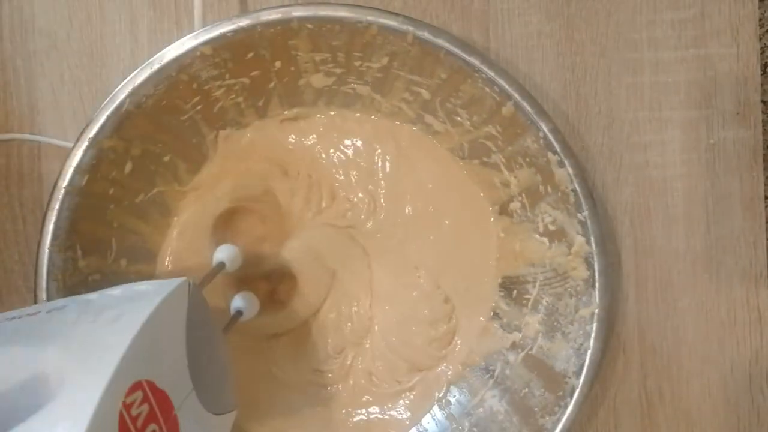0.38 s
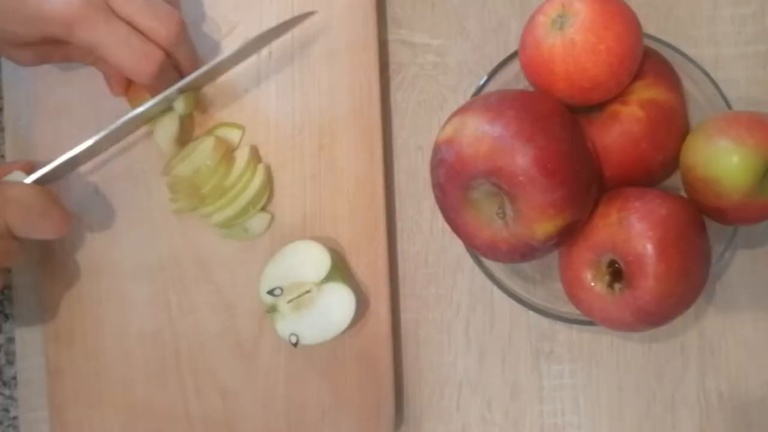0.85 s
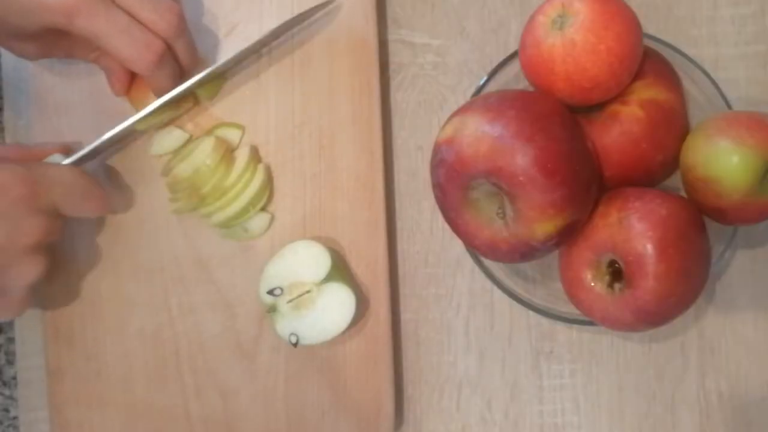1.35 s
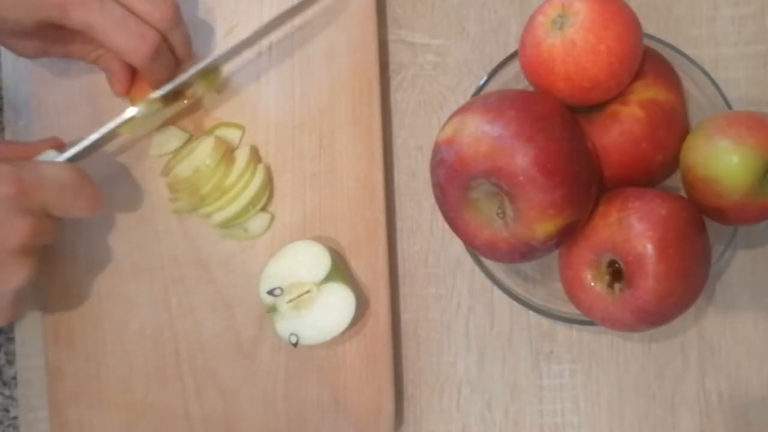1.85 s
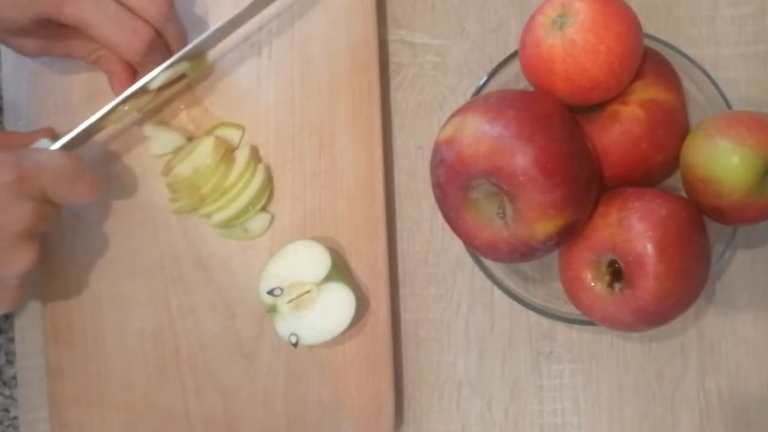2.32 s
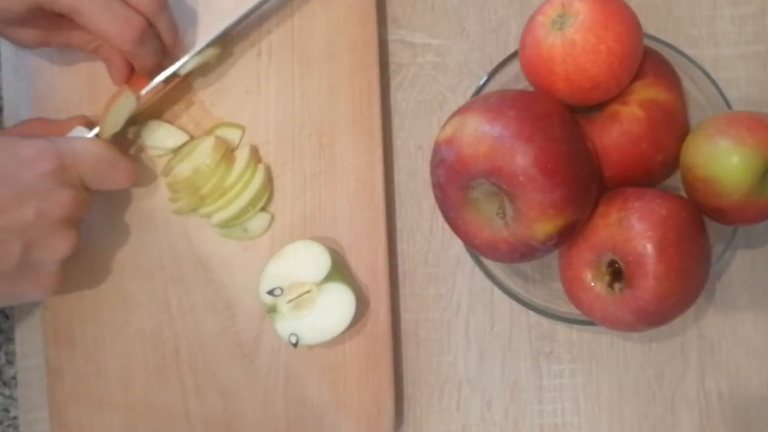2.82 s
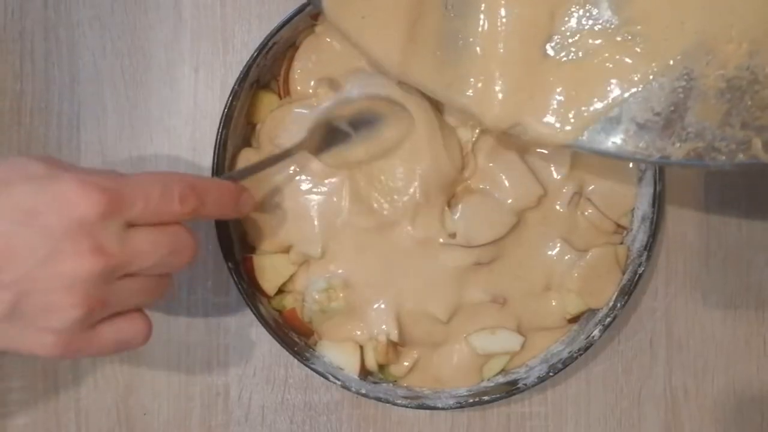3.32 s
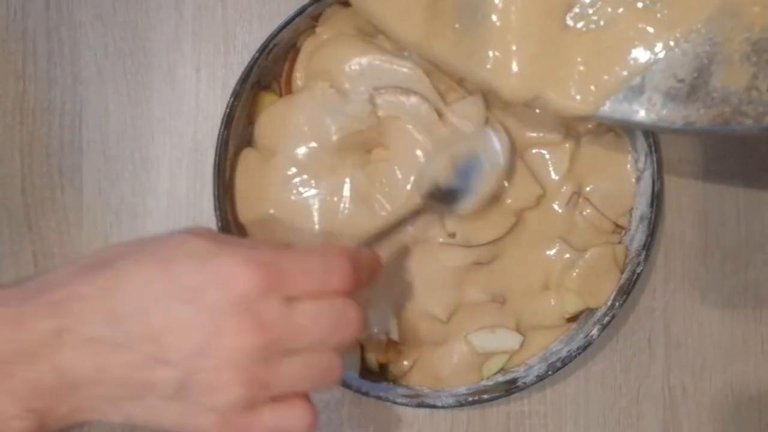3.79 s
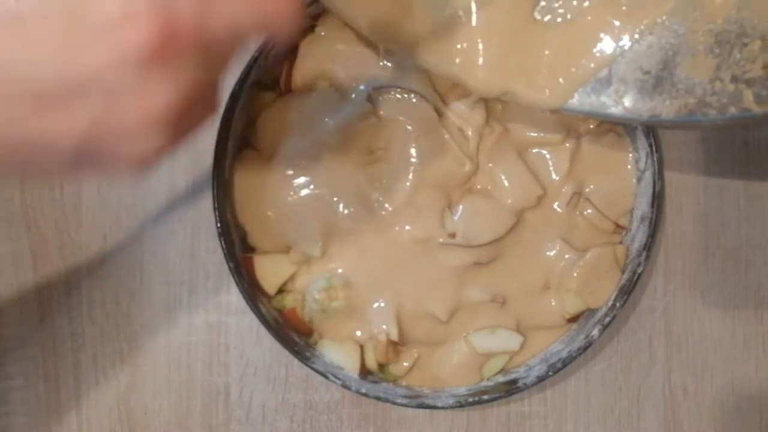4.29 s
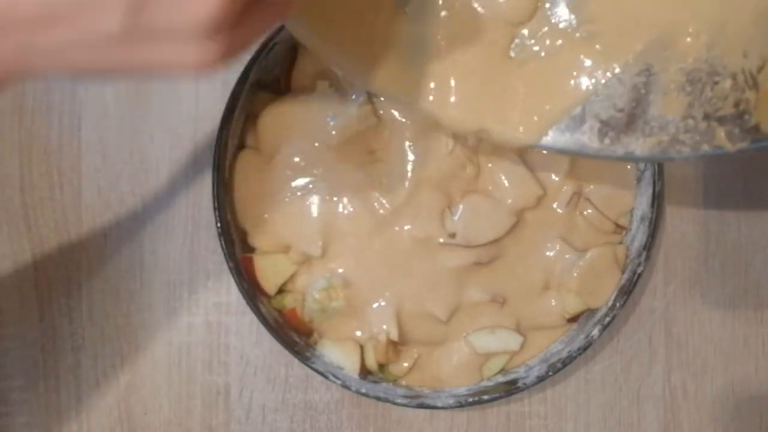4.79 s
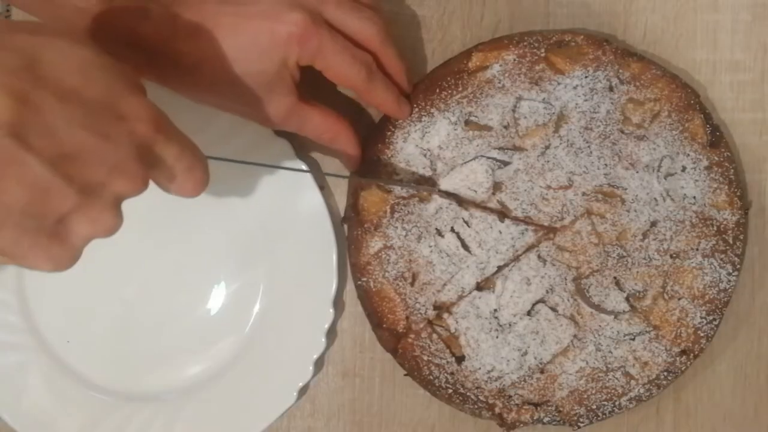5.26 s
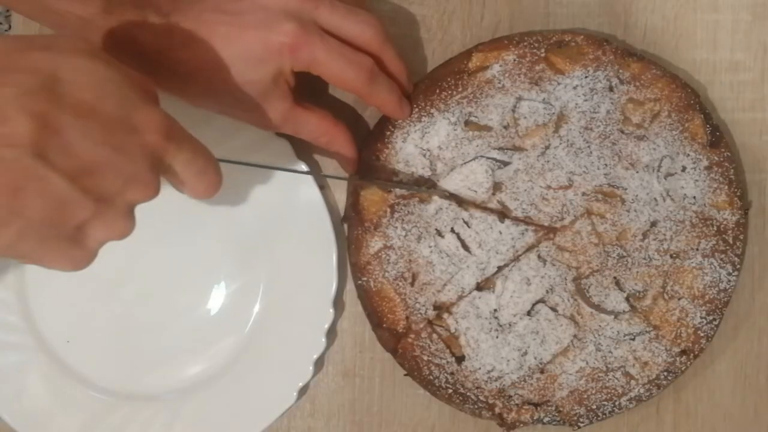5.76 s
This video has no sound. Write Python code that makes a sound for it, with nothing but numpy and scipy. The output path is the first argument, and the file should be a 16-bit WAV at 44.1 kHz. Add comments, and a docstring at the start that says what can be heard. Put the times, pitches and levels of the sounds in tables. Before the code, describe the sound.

An electric mixer whirs, then cuts abruptly to regular crunching knife chops on a wooden board, a few spoon knocks on a bowl, and faint low bumps.

```python
"""A hand mixer whirs in a steel bowl of batter (shaped noise and gear tones); then, by hard cuts, a knife crunches
through apple and chops on a wooden board (noise crackle, struck modes), a spoon knocks a bowl (struck modes) and a
knife cuts cake (soft crackle, jolts of the worktop). A phone hears it all from above the worktop: the hard-walled
kitchen adds scatter and a decaying tail, the worktop rumbles, and the right port is further away and shaded."""
import sys
import numpy as np
from scipy import signal
from scipy.fft import rfft, irfft
from scipy.io import wavfile
from scipy.ndimage import uniform_filter1d

SR = 44100
rng = np.random.default_rng(int(sys.argv[2]) if len(sys.argv) > 2 else 0)


def magnitude_from_level(level_db):
    """Linear magnitude for a level in decibels (20 dB per decade)."""
    exponent = np.asarray(level_db, float) / 20
    return 10 ** exponent


def master_out(mix):
    """Clip the mix to full scale and print it as 16-bit PCM to the path in sys.argv[1]."""
    frames = np.transpose(np.atleast_2d(mix))
    ceiling = np.clip(frames, -1, 1)
    pcm = np.round(ceiling * 32767).astype(np.int16)
    wavfile.write(sys.argv[1], SR, pcm)


N = 259308
TIME = np.arange(N) / SR  # s
HZ = np.maximum(np.arange(N // 2 + 1) * SR / N, 1)


def read(table, hz=HZ):
    """Logarithmic frequency scale: a table by Hz is interpolated along the octaves."""
    f, v = np.transpose(table)
    return np.interp(np.log(hz), np.log(f), v)


def level(x, db):
    """Root-mean-square level: the signal is scaled to the given dB."""
    return x * magnitude_from_level(db) / np.sqrt(np.mean(x ** 2))


def colour(x, table):
    """Linear filtering: each frequency is weighted by a table of Hz and dB."""
    return irfft(rfft(x, N) * magnitude_from_level(read(table)), N)


def band(lo_hz, hi_hz, channels=1):
    """Band-limited noise: white noise between two edges, rms 1."""
    sos = signal.butter(3, [lo_hz, hi_hz], "band", fs=SR, output="sos")
    return level(signal.sosfilt(sos, rng.standard_normal((channels, N))), 0)


def walk(rate):
    """Slow random modulation: noise averaged twice over 1/rate seconds, rms 1."""
    k = int(SR / rate)
    smooth = uniform_filter1d(rng.standard_normal(N), k)
    return level(uniform_filter1d(smooth, k), 0)


# Shading of the right port against the left for near sources. Each row: frequency in Hz, gain in dB
# (fading out in the bass).
NEAR_SHADE = [(220, 3), (400, 1), (700, -6.5), (1500, -3), (2300, -32), (5000, -24.5), (9000, -29),
              (15000, -10.5)]
# Extra phase lag of the right port. Each row: frequency in Hz, lag in radians.
RIGHT_PHASE_LAG = [(200, 0.22), (300, 1.4), (400, 0), (600, 1.26), (800, 0), (1000, 0.28)]
LAG_MS, MONO_HZ = 0.6045, 235.6  # delay of the right port; well below MONO_HZ delay and shading vanish


def to_right(x, shade):
    """Diffraction and path difference: the far port hears the treble later and shaded, the deep bass hardly so."""
    apart = HZ ** 4 / (HZ ** 4 + MONO_HZ ** 4)
    lag = 2 * np.pi * HZ * apart * LAG_MS / 1000 + read(RIGHT_PHASE_LAG)
    return irfft(rfft(x, N) * magnitude_from_level(read(shade) * apart) * np.exp(-1j * lag), N)


# Shading of the right port for diffuse sound. Each row: frequency in Hz, gain in dB (fading out in the bass).
ROOM_SHADE = [(220, 8.5), (500, -4), (1500, 0), (2300, 3.5), (5000, -1), (9000, -8), (15000, 6.5)]
# Coherence of the diffuse field. Each row: frequency in Hz, share common to both ports from 0 to 1.
COHERENCE = [(100, 1), (220, .9), (350, 0.33), (700, 0.68), (1100, 0.13), (1600, 0.22), (4000, 0.03)]


def diffuse(a, b):
    """Spatial coherence: two unrelated noises become a pair that is most alike in the bass."""
    common = np.clip(read(COHERENCE), 0, 1)
    mixed = common * rfft(a, N) + np.sqrt(1 - common ** 2) * rfft(b, N)
    return np.array([a, to_right(irfft(mixed, N), ROOM_SHADE)])


# Reverberation time. Each row: frequency in Hz, time to fall 60 dB in seconds.
ROOM_T60 = [(100, 0.69), (260, 0.5), (700, 0.54), (1840, 0.63), (4850, 0.5), (10000, 0.3)]
# Colour of the tail. Each row: frequency in Hz, relative level in dB.
ROOM_COLOUR = [(60, 6), (200, 1.5), (320, -6), (415, 8), (540, -6.5), (760, -2), (1200, -5.5), (2100, -4.5),
               (2900, -2.5), (3500, -3), (5000, 0), (9000, 1), (15000, 6)]
ROOM_DB, ROOM_GAP_S = -0.5, 0.0017  # tail before wet_db is added; silence before it
EARLY_DB, EARLY_T60_S = -3.5, 0.037  # scatter off the worktop and the things on it


def kitchen(x, wet_db=0.0):
    """Reverberation: direct sound, quick scatter nearby and a dense tail that dies band by band."""
    onset = np.clip(TIME / ROOM_GAP_S - 1, 0, 1)
    tail = 0
    for f in 90 * 2 ** np.arange(8):  # octave centres in Hz
        octave = band(f / np.sqrt(2), f * np.sqrt(2), channels=2) * np.sqrt(f)
        tail = tail + octave * 1000 ** (-TIME / read(ROOM_T60, f))
    tail = diffuse(*(colour(t * onset, ROOM_COLOUR) for t in tail))
    early = diffuse(*(band(220, 18000, channels=2) * 1000 ** (-TIME / EARLY_T60_S)))
    echo = magnitude_from_level(ROOM_DB + wet_db) * tail / np.linalg.norm(tail[0])
    echo = echo + magnitude_from_level(EARLY_DB) * early / np.linalg.norm(early[0])
    direct = np.array([x, to_right(x, NEAR_SHADE)])
    return direct + irfft(rfft(echo * (TIME < 2)) * rfft(x), N)


def swells(events, rise_s, t60):
    """Envelope: gains rise to each event as a Gaussian and die away exponentially."""
    out = 0
    for s, db in events:
        rise = np.exp(-((TIME - s) / rise_s) ** 2)
        fall = 1000 ** (-np.abs(TIME - s) / t60)
        out = out + magnitude_from_level(db) * np.where(TIME < s, rise, fall)
    return out


# Background of each moment. Each row: relative deep rumble, upper rumble and air, all in dB.
MOMENTS = [(-38, -50.5, -55.5), (-53, -66.5, -69), (-58.5, -70.5, -68.5), (-49, -59, -64)]
# The hand leans on the board and the deep rumble swells. Each row: time in seconds, relative level in dB.
PRESSES = [(1.085, -42.5), (1.43, -51), (1.65, -59.5), (1.97, -57.5), (2.13, -42.5), (2.48, -46),
           (2.62, -68), (2.87, -40.5)]
# Bands in which the upper rumble gathers. Each row: centre in Hz, width in Hz, relative level in dB.
HUMS = [(107.7, 28, 1), (160.6, 40, -5.5), (218.7, 30, -7)]
# Air of the quiet kitchen. Each row: frequency in Hz, relative density in dB per Hz.
AIR = [(200, -20), (320, -9.5), (414, -1.5), (520, -8), (720, -1.5), (1100, -8.5), (2080, -13.5),
       (2700, -15), (6500, -15.5), (9200, -12), (10600, -20), (13000, -24), (15800, -31.5)]
# A faint narrow hiss comes up. Each row: time in seconds, level in dB.
HISS = [(3.5, -95), (3.9, -82), (4.8, -78), (4.9, -81)]
WORKTOP_HZ, RUMBLE_WANDER_DB = 58.8, -1
PRESS_RISE_S, PRESS_T60_S = 0.015, 1
CHOP_RUMBLE_DB, CHOP_RUMBLE_T60_S = -57, 0.27  # upper rumble after a chop, against its peak


def background(shot):
    """Structure-borne sound: deep rumble reaches both ports alike, under diffuse upper rumble, air and hiss."""
    deep_gain, upper_gain, air_gain = magnitude_from_level(np.transpose(MOMENTS)) @ np.array(shot)
    presses = swells(PRESSES, PRESS_RISE_S, PRESS_T60_S) * shot[1]
    deep_gain = deep_gain * magnitude_from_level(RUMBLE_WANDER_DB * walk(27)) + presses
    after = swells([(s, db + CHOP_RUMBLE_DB) for s, db, _ in CHOPS], 0.0076, CHOP_RUMBLE_T60_S)
    upper_gain = upper_gain * magnitude_from_level(RUMBLE_WANDER_DB * walk(10)) + after * shot[1]
    sway = np.sin(2 * np.pi * np.cumsum(WORKTOP_HZ + 3 * walk(13)) / SR)
    deep = (0.56 * sway + 0.21 * band(22, 36)[0]) * deep_gain
    hums = sum(magnitude_from_level(db) * band(hz - w / 2, hz + w / 2, channels=2) for hz, w, db in HUMS)
    upper = diffuse(*hums) * upper_gain
    air = diffuse(*(colour(rng.standard_normal(N), AIR) for _ in range(2)))
    air = level(air, 0) * air_gain * magnitude_from_level(2.42 * walk(1.4))
    hiss_gain = magnitude_from_level(np.interp(TIME, *np.transpose(HISS))) * shot[2]
    hiss = diffuse(*band(1800, 2250, channels=2)) * hiss_gain
    return deep + upper + hiss + air


# Colour of small clicks and of crackling flesh. Each row: frequency in Hz, relative level in dB.
CRACKLE_COLOUR = [(590, -41), (1000, -17.5), (1460, -20.5), (2380, -14), (3170, -7), (4380, 0.5), (5340, 5),
                  (5850, 0.5), (9080, 10), (10900, -4), (14100, -14), (15800, -27.5)]


def clicks(events, decay_s):
    """Impulsive noise: tiny bright clicks start at once and decay exponentially."""
    env = sum(magnitude_from_level(db) * (TIME >= s) * np.exp(-np.abs(TIME - s) / decay_s) for s, db in events)
    return env * level(colour(rng.standard_normal(N), CRACKLE_COLOUR), 0)


# Course of the fan and brush noise. Each row: time in seconds, level in dB.
MIXER_LEVEL = [(0, -34), (.3, -36), (.6, -34.5), (.9, -35.5)]
# Colour of the fan and brush noise. Each row: frequency in Hz, relative density in dB per Hz.
HOUSING = [(150, -23), (250, -13), (292, -27), (406, -15.5), (451, -16.5), (575, -6.5), (800, -6),
           (1190, -11.5), (1520, -3.5), (1840, -8.5), (2840, -14.5), (6640, -21), (9390, -12.5),
           (10800, -27.5), (14500, -31), (15800, -47)]
# Rotor and gear tones. Each row: frequency in Hz, amplitude in dB, blur in Hz, clean share from 0 to 1.
GEAR_TONES = [(112.6, -53.5, 5.9, 1), (223.6, -57.5, 5.1, 0.2), (386, -70, 17, 0.64), (762, -61, 30, 0.1),
              (1025, -46.5, 43, 0.76), (1534, -48.5, 40, 0.3), (1565, -55.5, 35, 0.37),
              (1896, -44.5, 29, 0), (2232, -47, 140, 0), (4300, -52.5, 150, 0.75), (5570, -57, 420, 0.1),
              (9240, -67.5, 320, 0.24), (12030, -50.5, 1300, 0.5)]
# Beaters grazing the bowl. Each row: start in seconds, level at onset in dB.
GRAZES = [(0.397, -27), (0.4485, -26.5), (0.573, -24.5), (0.696, -27), (0.8046, -30)]


def mixer():
    """Amplitude and phase modulation: rough noise, gear tones blurred by play in the teeth, grazes on steel."""
    rough = rng.standard_normal(N) * magnitude_from_level(2.0 * walk(440) + 0.55 * walk(31))
    out = level(colour(rough, HOUSING), 0) * magnitude_from_level(np.interp(TIME, *np.transpose(MIXER_LEVEL)))
    speed = 1 + .004 * walk(4.85)  # the batter's drag varies
    for hz, db, blur, clean in GEAR_TONES:
        turn = 2 * np.pi * hz * np.cumsum(speed) / SR
        clean = np.clip(clean, 0, 1)
        in_phase = clean + (1 - clean) * walk(blur)
        quadrature = (1 - clean) * walk(blur)
        out = out + magnitude_from_level(db) * (in_phase * np.sin(turn) + quadrature * np.cos(turn))
    return out + clicks(GRAZES, .003)


# Colour of the crack of a blow. Each row: frequency in Hz, relative level in dB.
CRACK = [(1500, -14), (3000, 1), (5000, 0), (7000, 4), (9000, 8), (10500, -8), (13000, -18), (16000, -30)]


def strikes(events, modes, scatter_db, flip=0.98):
    """Modal excitation: two half-sine pushes per blow set modes ringing, with a short crack of noise."""
    out, cracks, t = np.zeros(N), 0, TIME[:SR // 3]
    hz, db, t60 = np.transpose(modes)[:, :, None]
    chance = rng.standard_normal((len(events), len(modes), 1))
    # with flip near -1 neighbouring modes start opposite ways
    sides = flip ** np.arange(1, len(modes) + 1)[:, None] * flip
    for (s, peak_db, ms, crack_db, spot_hz, fall_db, again_ms, again_db), c in zip(events, chance):
        gain = sides * magnitude_from_level(db + scatter_db * c - fall_db * np.log2(hz / spot_hz) ** 2)
        ring = np.sum(gain * np.sin(2 * np.pi * hz * t) * 1000 ** (-t / t60), axis=0)
        u = 1000 * t[:900]  # ms
        first = np.sin(np.pi * np.clip(u / ms, 0, 1))
        second = magnitude_from_level(again_db) * np.sin(np.pi * np.clip((u - again_ms) / ms, 0, 1))
        pushed = np.convolve(ring, first + second)
        ring = -np.diff(pushed, prepend=0)[:len(t)]  # the air follows the acceleration
        out[int(s * SR):][:len(t)] += magnitude_from_level(peak_db) * ring / np.abs(ring).max()
        cracks = cracks + magnitude_from_level(peak_db + crack_db) * (TIME >= s) * np.exp(-np.abs(TIME - s) / 0.00045)
    crack_rms = np.sqrt(np.mean(magnitude_from_level(2 * read(CRACK))))
    return out + colour(cracks * rng.standard_normal(N), CRACK) / crack_rms


# Knife on board. Each row: start in seconds, peak of the ring in dB, crack in dB relative to that peak.
CHOPS = [(.83, -10, -18), (1.1811, -8, -13), (1.5166, -4.5, -14), (1.8668, -6.5, -19), (2.2248, -7.5, -19),
         (2.5914, -7, -22)]
# Modes of the wooden board. Each row: frequency in Hz, relative level in dB, time to fall 60 dB in seconds.
BOARD = [(164.9, 16, 0.09), (215.1, 11, 0.045), (414.4, 9.5, 0.031), (768, 11, 0.019), (849, 1, 0.019),
         (1089, -1, .02), (1194.3, 10.5, 0.062), (1370, -9, 0.0097), (1406, -1.5, 0.01), (1886, 7, 0.023),
         (2003, 9.5, 0.031), (2075, 9.5, 0.035), (2137, -4.5, 0.01), (2278, -8, 0.019), (2787, 8, 0.021),
         (2723, 1.5, 0.012), (4430, -31, 0.028), (5350, -22, .018)]
SCATTER_DB = 1.5  # spread of mode levels from blow to blow
CHOP_CONTACT_MS, CHOP_HZ, CHOP_FALL_DB = .33, 1720, 1.5  # favoured pitch, fall an octave away
HEEL_MS, HEEL_DB = 1.25, -2  # the rest of the edge lands just after
LEAD_S, LEAD_DB = .005, -26  # a faint early copy of each chop


def chop():
    """Modal vibration of a plate: each chop has the same contact time, preceded by a faint early copy."""
    events = [(s, db, CHOP_CONTACT_MS, crack_db, CHOP_HZ, CHOP_FALL_DB, HEEL_MS, HEEL_DB)
              for s, db, crack_db in CHOPS]
    blows = strikes(events, BOARD, SCATTER_DB, flip=-1.0095)
    return blows + magnitude_from_level(LEAD_DB) * np.roll(blows, -int(LEAD_S * SR))


# Blade through apple flesh or crust. Each row: start in seconds, level in dB, rise in seconds,
# boost below 3500 Hz in dB.
SLICES = [(1.106, -26, .026, 10.5), (1.457, -26, 0.016, 11), (1.8066, -31.5, 0.0045, 12),
          (2.159, -28, 0.018, 7), (2.526, -24, 0.021, 6.5), (2.886, -32.5, .008, 6),
          (5.302, -42.5, .005, 8)]
SLICE_S, SLICE_FADE_DB = 0.053, -20.5
# The edge first nicks the skin. Each row: start in seconds, level in dB.
NICKS = [(1.064, -61.5), (1.414, -58.5), (2.11, -58.5), (2.48, -56), (2.85, -49)]
NICK_RISE_S, NICK_S, NICK_FADE_DB, NICK_LOW_DB = .004, 0.057, -13.5, -16
# Soft rustles. Each row: start in seconds, level in dB, length in seconds.
RUSTLES = [(3.446, -63, .11), (4.865, -53.5, 0.041), (5.214, -72, 0.2), (5.634, -58.5, 0.046),
           (5.683, -52.5, 0.17)]
RUSTLE_RISE_S, RUSTLE_FADE_DB, RUSTLE_LOW_DB = 0.0076, -12.5, 8.5


def crunch(shot):
    """Granular fracture noise: cells burst in a dense, uneven crackle while the blade moves."""
    grains = rng.standard_normal(N) * magnitude_from_level(2.4 * rng.exponential(size=N) + 2.4 * walk(250))
    full = level(colour(grains, CRACKLE_COLOUR), 0)
    low = signal.sosfilt(signal.butter(2, 3500, fs=SR, output="sos"), full)
    strokes = [(s, db, rise_s, SLICE_S, SLICE_FADE_DB, low_db) for s, db, rise_s, low_db in SLICES]
    strokes += [(s, db, NICK_RISE_S, NICK_S, NICK_FADE_DB, NICK_LOW_DB) for s, db in NICKS]
    strokes += [(s, db, RUSTLE_RISE_S, length_s, RUSTLE_FADE_DB, RUSTLE_LOW_DB) for s, db, length_s in RUSTLES]
    out = 0
    for s, db, rise_s, length_s, fade_db, low_db in strokes:
        t = TIME - s
        edges = np.clip(t / rise_s, 0, 1) ** 2 * np.clip((length_s - t) / 0.0072, 0, 1)
        env = edges * magnitude_from_level(db + fade_db * np.clip(t / length_s, 0, 1))
        moment = shot[np.searchsorted(CUTS, s) - 1]
        out = out + moment * env * (full + (magnitude_from_level(low_db) - 1) * low)
    return out


# Faint sticky ticks. Each row: start in seconds, level at onset in dB.
TICKS = [(3.6438, -46), (4.083, -53), (4.799, -44), (4.8953, -40.5), (5.0795, -46), (5.686, -38),
         (5.7638, -50)]


def sticky_ticks():
    """Impulsive release: each faint sticky tick is a click of about a millisecond."""
    return clicks(TICKS, .0012)


# Blows that jolt the worktop. Each row: start in seconds, relative level in dB, favoured frequency in Hz.
JOLTS = [(4.364, -24, 122), (5.686, -12.5, 153), (5.716, -15, 130), (5.756, -14.5, 167),
         (5.783, -19.5, 153), (5.811, -24, 130), (5.834, -33, 158)]
# Modes of the worktop. Each row: frequency in Hz, relative level in dB, time to fall 60 dB in seconds.
WORKTOP = [(61.4, -2, 0.82), (130, 0, 0.15), (155.3, 4, 0.085), (211.4, 5, 0.058)]
JOLT_FALL_DB, JOLT_FLOOR_DB = 220, 25  # modes fade an octave from the favoured pitch, and at most
RATTLE_DB = -24  # crockery shaken by the worktop


def jolts():
    """Low-frequency modal response: soft pushes ring the worktop, and what stands on it rattles along."""
    ring = 0
    for s, db, spot_hz in JOLTS:
        t = np.maximum(TIME - s, 0)
        rise = (1 - np.exp(-t / .007)) ** 2
        modes = 0
        for hz, mode_db, t60 in WORKTOP:
            fall_db = min(JOLT_FALL_DB * np.log2(hz / spot_hz) ** 2, JOLT_FLOOR_DB)
            modes = modes + magnitude_from_level(mode_db - fall_db) * 1000 ** (-t / t60) * np.sin(2 * np.pi * hz * t)
        ring = ring + magnitude_from_level(db) * rise * modes
    shake = uniform_filter1d(np.abs(ring), size=600)
    return ring + magnitude_from_level(RATTLE_DB) * shake * diffuse(*band(220, 2000, channels=2))


# Spoon on bowl. Each row: start in seconds, peak of the ring in dB, contact in ms, favoured frequency in Hz,
# delay of the rebound in ms, its level in dB relative to the first push.
KNOCKS = [(4.3695, -14, .22, 680, 14, -8), (4.4855, -8, .15, 1000, 4.5, -20),
          (4.8958, -20, .6, 590, 3.4, -9)]
# Modes of the bowl. Each row: frequency in Hz, relative level in dB, time to fall 60 dB in seconds.
BOWL = [(200, 16, .04), (330, 15, .05), (410, 5, .05), (465, 5, .05), (570, 18, .05), (650, 9, .04),
        (800, 5, .045), (915, 1, .035), (1090, 1, .045), (1260, -4, .03), (1460, -1, .04), (1610, -6, .035),
        (1800, -5, .045), (2050, -8, .05), (2300, -8, .03), (2770, -9, .02), (3300, -2, .015)]
KNOCK_FALL_DB_PER_MS = 40  # a softer blow, longer in contact, is narrower and cracks less
KNOCK_CRACK_DB, KNOCK_CRACK_DB_PER_MS = -4, -30


def spoon():
    """Contact time and bandwidth: the duration of each knock sets its width and crack."""
    events = []
    for s, db, ms, hz, again_ms, again_db in KNOCKS:
        crack_db = KNOCK_CRACK_DB + KNOCK_CRACK_DB_PER_MS * ms
        events.append((s, db, ms, crack_db, hz, KNOCK_FALL_DB_PER_MS * ms, again_ms, again_db))
    return strikes(events, BOWL, SCATTER_DB)


# Bounds of the four moments. Each entry: time in seconds.
CUTS = [0, .902, 2.916, 4.903, 6]


def scene():
    """Superposition: each moment sounds in the kitchen and is cut off, tail and all, when the next begins."""
    shot = [uniform_filter1d(1. * (TIME >= a) * (TIME < b), size=40) for a, b in zip(CUTS, CUTS[1:])]
    chops, knocks = chop(), spoon()
    small = crunch(shot) + sticky_ticks()
    motor = mixer() * shot[0]
    # the hand moves the mixer, so one set of echoes melts into another
    sweep = 2 * np.pi * TIME / 1.146
    moments = [kitchen(motor * np.cos(sweep) ** 2, 0.99) + kitchen(motor * np.sin(sweep) ** 2, 0.37),
               kitchen(chops + small * shot[1], 0.94),
               kitchen(knocks + small * shot[2], 0.066),
               kitchen(small * shot[3], 0.36)]
    return sum(m * gate for m, gate in zip(moments, shot)) + jolts() + background(shot)


def band_limit(x):
    """A steep low-pass at the top of the band."""
    return signal.sosfilt(signal.butter(12, 16150, fs=SR, output="sos"), x)


def record(dry):
    """Two-port pickup: the finished mix is the pressure at the left and right ports."""
    return band_limit(dry)


dry = scene()
out = record(dry)
master_out(out)
```